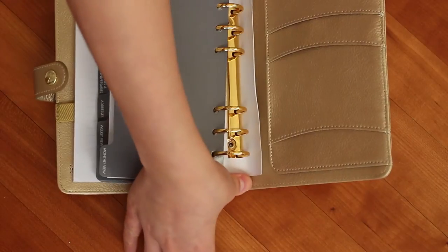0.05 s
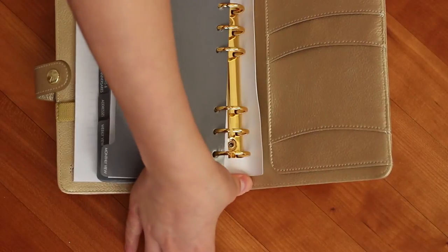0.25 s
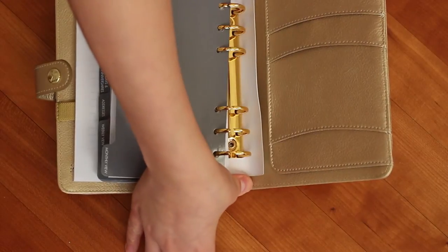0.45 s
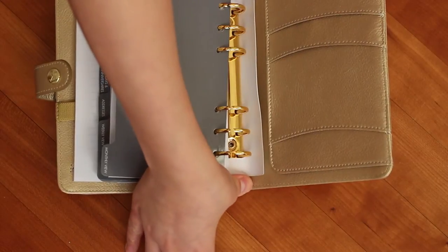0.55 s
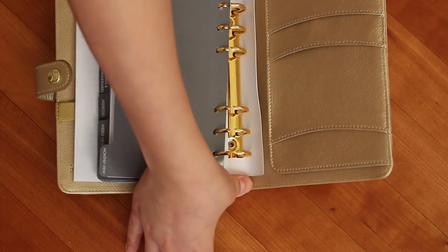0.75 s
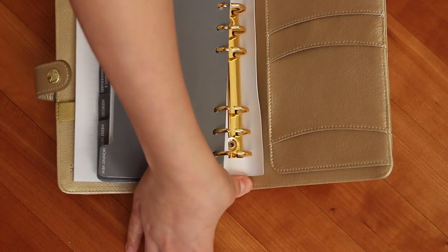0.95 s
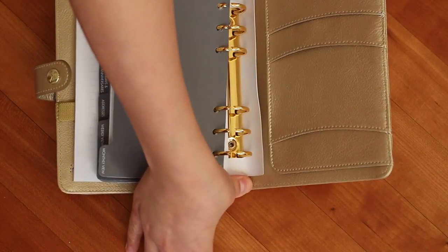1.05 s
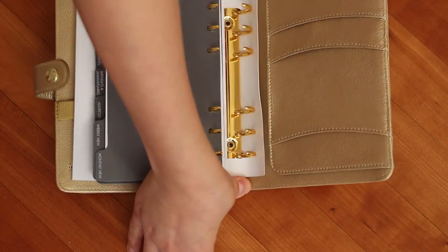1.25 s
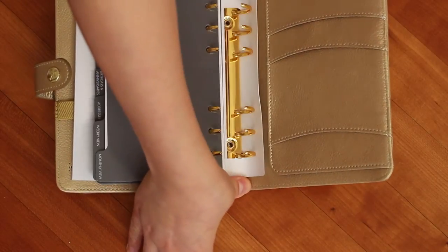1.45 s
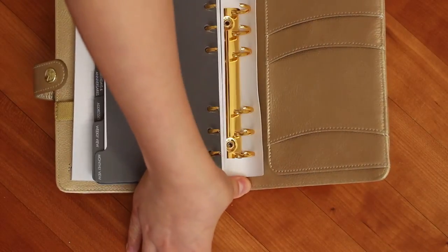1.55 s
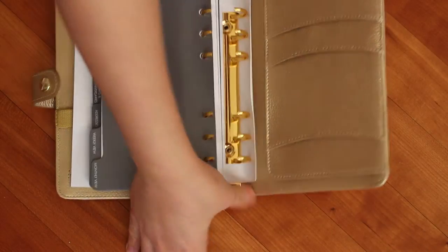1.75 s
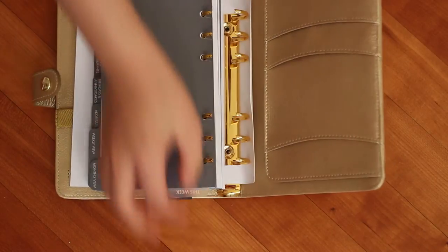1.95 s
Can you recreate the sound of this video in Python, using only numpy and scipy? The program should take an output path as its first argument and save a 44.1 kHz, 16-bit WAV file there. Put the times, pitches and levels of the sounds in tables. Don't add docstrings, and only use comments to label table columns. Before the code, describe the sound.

Metal binder rings of a leather planner snap open with one loud, bright crack after two faint ticks; a small bare room answers briefly, then a hand brushes softly off the cover, close stereo microphone.

```python
import sys
import numpy as np
from scipy import signal
from scipy.io import wavfile

SR = 44100
rng = np.random.default_rng(int(sys.argv[2]) if len(sys.argv) > 2 else 0)


def generate_wav(sig):
    pcm = np.round(np.clip(np.atleast_2d(sig).T, -1, 1) * 32767).astype(np.int16)
    wavfile.write(sys.argv[1], SR, pcm)


def voltage_ratio(level):
    return 10 ** (np.asarray(level, float) / 20)


N = 89082
SNAP_S = 1.266

# (frequency [Hz], level [dB], 60 dB decay [s], left-right [dB])
RING_TONES = [(2350, -9, .008, 1), (3030, -13, .012, 3), (3690, -14, .015, 4), (4080, -8, .008, 7),
              (5120, -3, .007, 7), (6200, 1, .007, 6), (7300, -5, .006, 0), (8850, -8, .008, -6),
              (9520, -3, .006, -6), (10600, -6, .005, -2), (11800, -9, .006, 0), (13200, -9, .005, 1),
              (14200, -12, .005, 0)]


def at_hz(points, hz):
    table_hz, values = np.array(points)[:, 0], np.array(points)[:, 1]
    return np.interp(np.log(hz), np.log(table_hz), values)


def ring(clicks, hz, t60):
    r, w = voltage_ratio(-60 / (t60 * SR)), 2 * np.pi * hz / SR
    return signal.lfilter([0, np.sin(w)], [1, -2 * r * np.cos(w), r * r], clicks + 1e-18)


def clicks_at(s, size):
    out = np.zeros(N)
    samples = np.clip((np.asarray(s) * SR).astype(int), 0, N - 1)
    np.add.at(out, samples, size)
    return out


def soft(x, hz):
    r = np.exp(-2 * np.pi * hz / SR)
    return signal.lfilter([(1 - r) ** 2], [1, -2 * r, r * r], x)


def strike(s, db, modes, spread_db):
    luck = rng.standard_normal(size=(len(s), 14))
    out = 0
    for k, (hz, level_db, t60, pan_db) in enumerate(modes):
        clicks = clicks_at(s, voltage_ratio(db + level_db + spread_db * luck[:, k]))
        sides = voltage_ratio(np.array([[pan_db], [-pan_db]]) / 2)
        out = out + ring(clicks, hz, t60) * (-1) ** k * sides
    return out


def bands(count):
    edges = 22 * 2 ** np.arange(0, 9.7, 1 / 3)
    white = rng.standard_normal((2, 2, count))
    for k, (low, high) in enumerate(zip(edges, edges[1:])):
        band = signal.butter(2, [low, high], "band", fs=SR, output="sos")
        yield np.sqrt(low * high), signal.sosfilt(band, white[k % 2])


def air():
    # (frequency [Hz], level [dB per Hz])
    shared_colour = [(25, -8), (50, -8), (85, 0), (160, -9), (450, -12), (900, -17), (2000, -18),
                     (15500, -19)]
    # (frequency [Hz], level [dB per Hz])
    side_colour = [(25, -12), (60, -4), (119, -1), (260, -12), (582, -15), (850, -13), (1900, -12),
                   (15500, -15)]
    mid_db, side_db, patchy_db, left_db = -56, -57, 1.0, .8
    out = 0
    for hz, pair in bands(N + SR // 2):
        slow = np.interp(np.arange(N), np.linspace(0, N, num=24), rng.standard_normal(size=24))
        colour_db = np.array([[at_hz(shared_colour, hz)], [at_hz(side_colour, hz)]])
        out = out + pair[:, -N:] * voltage_ratio(colour_db + patchy_db * slow)
    mid, side = out / out.std(axis=1, keepdims=True) * voltage_ratio(np.array([[mid_db], [side_db]]))
    return np.array([mid + side, mid - side]) * voltage_ratio(np.array([[left_db], [-left_db]]))


def room(x):
    # (frequency [Hz], 60 dB decay [s])
    decay = [(100, .45), (500, .33), (1000, .3), (2000, .29), (6000, .28), (11000, .2), (15000, .12)]
    # (frequency [Hz], level [dB])
    colour = [(100, -8), (220, -3), (420, 7), (900, 4), (1600, 4), (3000, 1), (9000, 3), (15000, -9)]
    # (frequency [Hz], likeness [-1 to 1])
    likeness = [(60, 0.49), (180, -0.21), (550, 0.36), (1650, -0.39), (4970, -0.58), (15000, -0.53)]
    level_db, onset_s = 1.5, .004
    t, tail = np.arange(SR) / SR, 0
    for hz, (mid, side) in bands(len(t)):
        alike = np.clip(at_hz(likeness, hz), -.95, .95)
        fade = voltage_ratio(at_hz(colour, hz) - 60 * t / at_hz(decay, hz))
        noise = np.sqrt(1 + alike) * mid + np.sqrt(1 - alike) * side * [[1], [-1]]
        tail = tail + fade * noise
    build_up = 1 - np.exp(-(t / onset_s) ** 2)
    tail = tail * build_up / np.sqrt(np.mean(np.sum(tail ** 2, axis=1)))
    return voltage_ratio(level_db) * signal.fftconvolve(x.mean(axis=0)[None], tail, axes=1)[:, :N]


def focus_motor():
    group_moves = [0, 2, 4, 6]
    # (frequency [Hz], 60 dB decay [s], left [dB], right [dB], right sign)
    housing = [(480, .02, -46, -46, -1), (500, .16, -66, -68, -1), (452, .12, -66, -72, 1)]
    # (frequency [Hz], 60 dB decay [s], left [dB], right [dB])
    jerk_tones = [(335, .07, -46, -45), (240, .08, -56, -58), (1330, .02, -52, -54), (450, .04, -47, -66)]
    frame_s, first_move_s = 1001 / 30000, .1022
    step_hz, step_soft_hz, spread_db = 480, 1500, 1.0

    frames = (9 * np.arange(-1, 7)[:, None] + group_moves).ravel()[3:]
    starts = first_move_s + frame_s * frames
    direction = (-1.) ** (np.arange(len(starts)) + 1)
    push = direction * voltage_ratio(spread_db * rng.standard_normal(len(starts)))
    inside = starts < N / SR
    starts, push = starts[inside], push[inside]

    steps = np.arange(11) / step_hz
    step_clicks = clicks_at((starts[:, None] + steps).ravel(), np.repeat(push, len(steps)))
    run = soft(step_clicks, step_soft_hz)
    jerk = clicks_at(starts, push)
    out = 0
    for hz, t60, left_db, right_db, sign in housing:
        out = out + ring(run, hz, t60) * [[voltage_ratio(left_db)], [sign * voltage_ratio(right_db)]]
    for hz, t60, left_db, right_db in jerk_tones:
        out = out + ring(jerk, hz, t60) * [[voltage_ratio(left_db)], [-voltage_ratio(right_db)]]
    return out


def rustle():
    # (time [s], level [dB])
    slide = [
        (1.79, -80),
        (1.81, -55),
        (1.87, -62),
        (1.95, -74),
        (2.02, -78),
    ]
    s, db = np.transpose(slide)
    grains = rng.standard_normal(N) * voltage_ratio(3.0 * rng.exponential(1, N))
    grains = signal.sosfilt(signal.butter(2, [900, 9000], "band", fs=SR, output="sos"), grains)
    return grains / grains.std() * voltage_ratio(np.interp(np.arange(N) / SR, s, db, left=-np.inf))


def ticks():
    # (time [s], slip level [dB], slip length [s], knock level [dB], knock delay [s])
    lever = [
        (.1602, -36, .0026, -39, .0028),
        (.7138, -42, .002, -37, .001),
        (1.2396, -54, .001, -38, .0002),
        (1.805, -58, .012, -54, .001),
        (1.940, -58, .004, -64, .001),
    ]
    # (frequency [Hz], level [dB], 60 dB decay [s], left-right [dB])
    knock_tones = [
        [(680, 1, .04, 1), (1000, -1, .03, 1), (500, -8, .03, 1), (1830, -14, .02, 1)],
        [(237, -19, .15, 0), (740, -1, .045, 1), (1130, -1, .045, 1), (560, -8, .03, 0), (950, -14, .03, 0),
         (2100, -10, .015, 1)],
        [(1550, 0, .012, 1)],
        [(945, 0, .05, 0), (1570, -3, .03, 0)],
        [(1500, 0, .02, 0)],
    ]
    out = 0
    for (s, slip_db, length, knock_db, delay), tones in zip(lever, knock_tones):
        slip_times = s + length * (np.arange(6) + .6 * rng.random(size=6)) / 6
        slip = strike(slip_times, slip_db, RING_TONES[:5], spread_db=3.0)
        knock = strike([s + delay], knock_db + 5, tones, spread_db=1.5)
        out = out + slip + soft(knock, hz=3000)
    return out


def table_sway():
    # (frequency [Hz], level [dB], 60 dB decay [s], left-right [dB])
    table_tones = [(63, -38, .9, 3), (88, -29, .5, 6), (105, -34, .6, -6)]
    return soft(strike([SNAP_S], 0, table_tones, spread_db=0), hz=200)


def snap():
    # (time [s], metal level [dB], body level [dB], softness limit [Hz])
    contacts = [
        (1.2631, -23, -40, 12000),
        (1.2636, -20, -30, 12000),
        (1.2641, -1, -3, 12000),
        (1.2650, -6, -10, 12000),
        (1.2656, -6, -12, 12000),
        (1.2665, -12, -16, 9000),
        (1.2675, -10, -14, 9000),
        (1.2690, -16, -8, 5000),
        (1.2698, -16, -14, 6000),
    ]
    # (frequency [Hz], level [dB], 60 dB decay [s], left-right [dB])
    cover_tones = [(200, -24, .03, -4), (330, -22, .03, -2), (440, -8, .04, 0), (640, -5, .02, 0),
                   (725, -5, .025, 0), (888, -6, .03, 0), (1100, -9, .015, 0), (1590, 6, .008, 0),
                   (1950, -3, .008, 0)]
    s, metal_db, body_db, soft_hz = np.transpose(contacts)
    crack = 0
    for time, db, hz in zip(s, metal_db, soft_hz):
        crack = crack + soft(rng.standard_normal(size=(2, 1)) * clicks_at([time], voltage_ratio(db + 3)), hz)
    metal = strike(s, metal_db - 3, RING_TONES, spread_db=3.0)
    cover = strike(s, body_db - 5, cover_tones, spread_db=1.5)
    return signal.sosfilt(signal.butter(2, 330, "high", fs=SR, output="sos"), metal + cover + crack)


def scene():
    crack_to_room_db, ring_to_room_db, ticks_to_room_db = 17.0, -12.0, -17.0
    loud, faint = snap(), ticks() + rustle()
    left, right = loud + faint
    planner = np.array([left, np.roll(right, 3)])
    walls = voltage_ratio(ring_to_room_db) * loud + voltage_ratio(ticks_to_room_db) * faint
    walls = walls + clicks_at([SNAP_S], voltage_ratio(crack_to_room_db))
    return planner + room(walls) + table_sway() + focus_motor() + air()


def roll_off(x):
    return signal.sosfilt(signal.butter(12, 15630, fs=SR, output="sos"), x)


def record(dry):
    duck_above_db, duck_share = -18, .8
    lag_s, attack_s, recover_db_per_s = .0055, .0015, 200
    level_db = 20 * np.log10(np.abs(dry).max(axis=0) + 1e-9)
    over = duck_share * np.maximum(level_db - duck_above_db, 0)
    ramp = recover_db_per_s * np.arange(N) / SR
    held = np.maximum.accumulate(over + ramp) - ramp
    held = np.roll(held, int(lag_s * SR))
    r = np.exp(-1 / (attack_s * SR))
    duck_db = signal.lfilter([1 - r], [1, -r], held)
    x = np.clip(dry * voltage_ratio(-duck_db), -1, 1)
    x = signal.sosfilt(signal.cheby2(12, 60, 16300, fs=SR, output="sos"), x)
    return roll_off(np.clip(x, -1, 1))


dry = scene()
out = record(dry)
generate_wav(out)
```